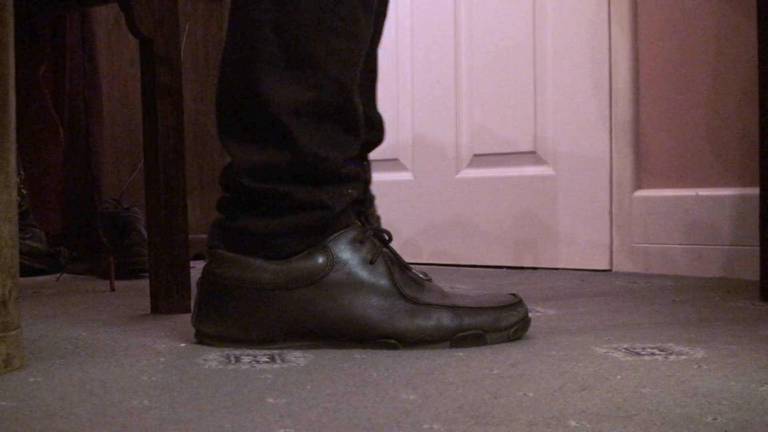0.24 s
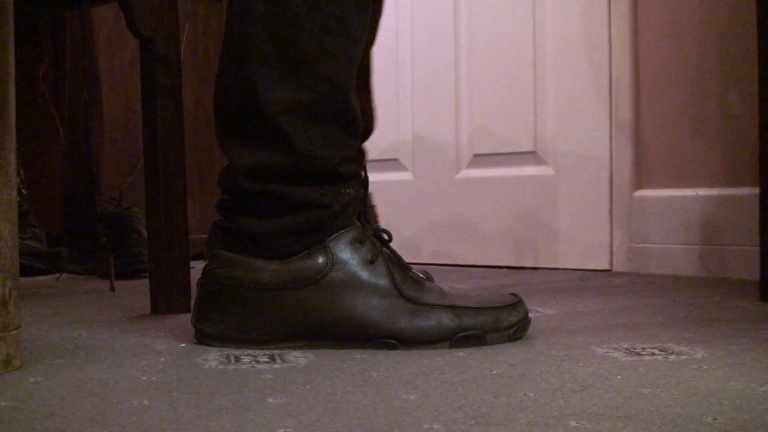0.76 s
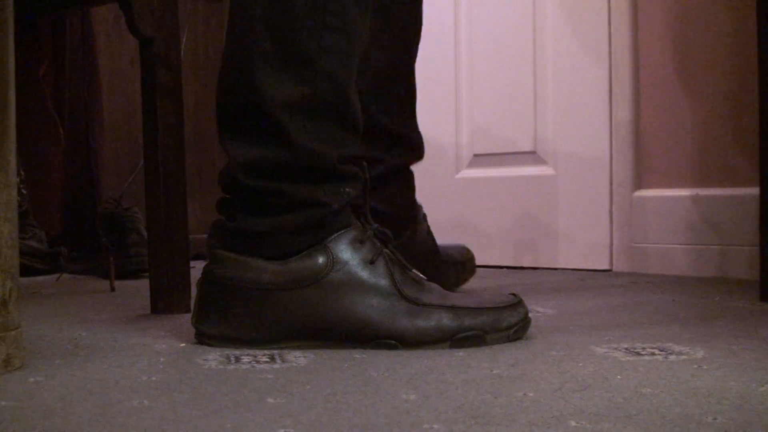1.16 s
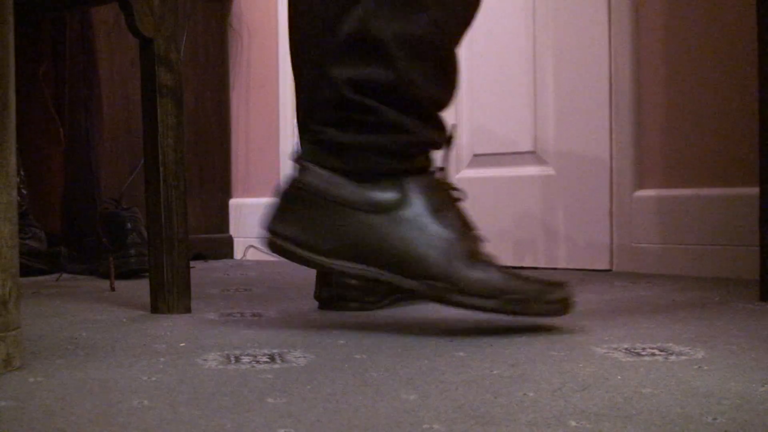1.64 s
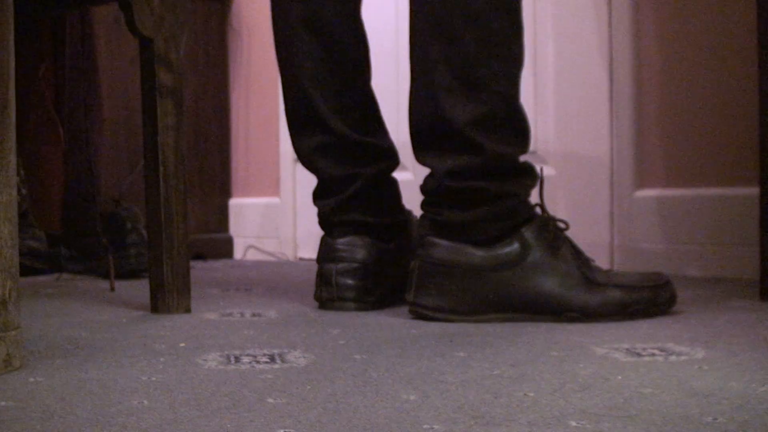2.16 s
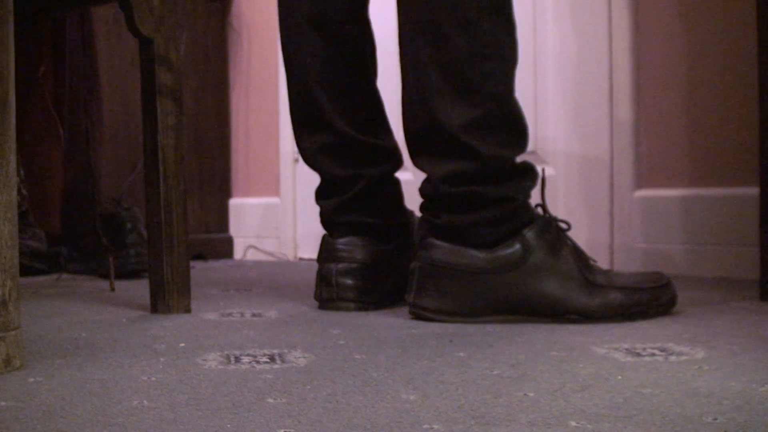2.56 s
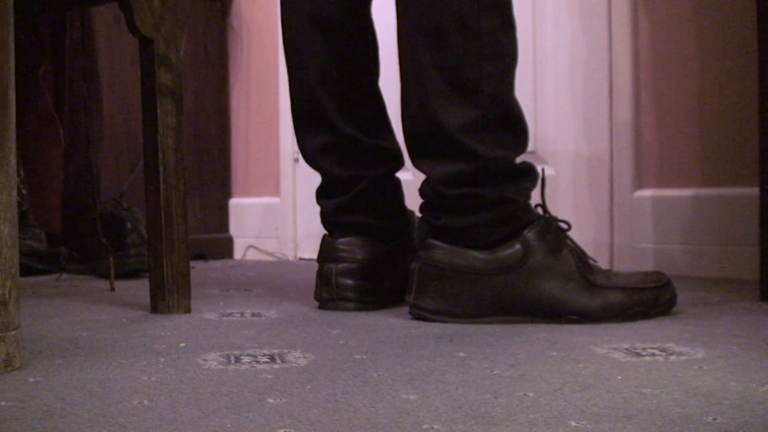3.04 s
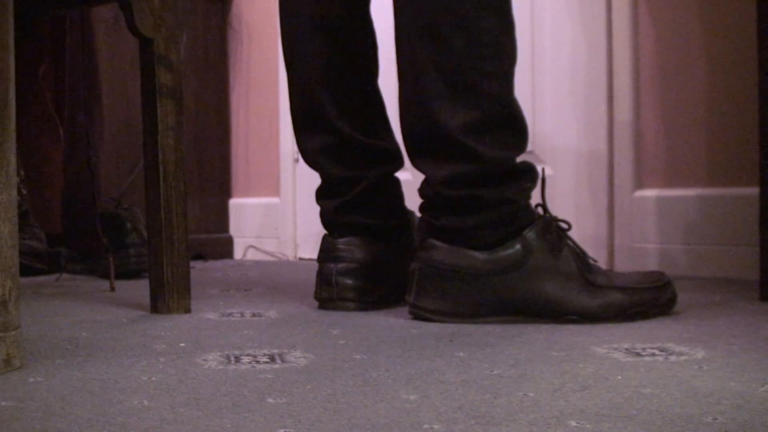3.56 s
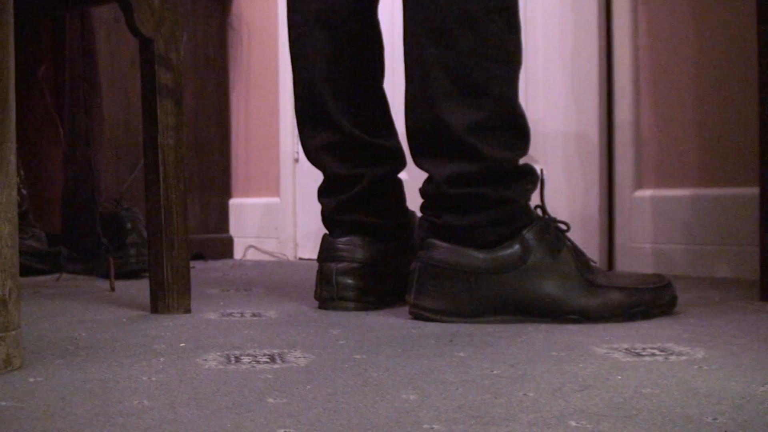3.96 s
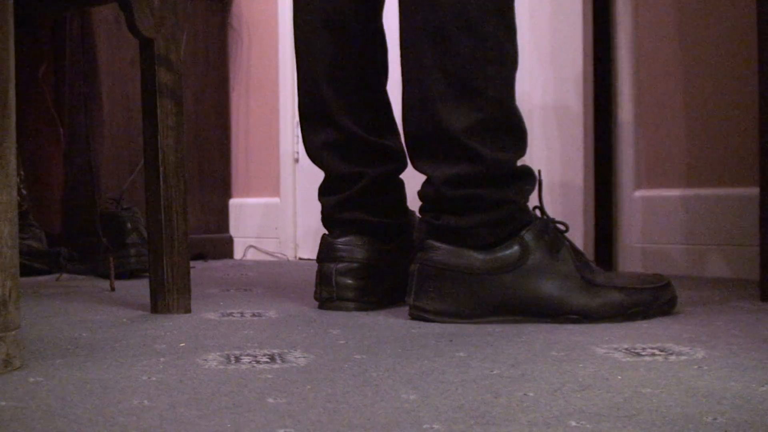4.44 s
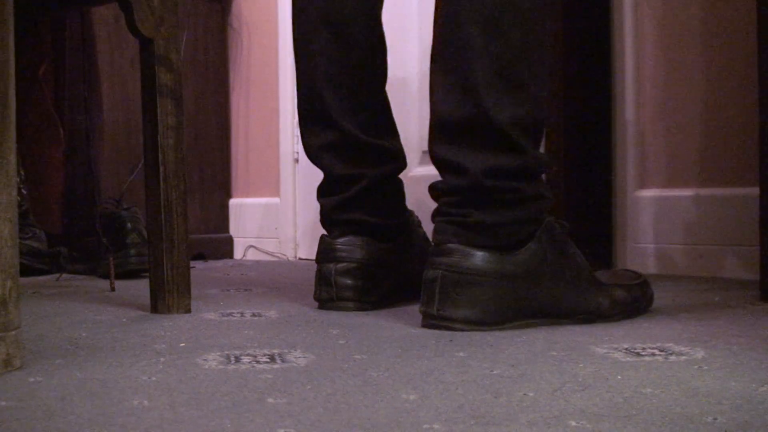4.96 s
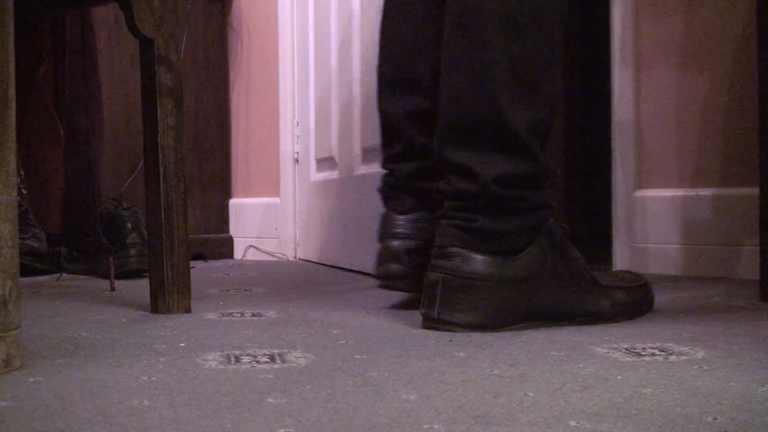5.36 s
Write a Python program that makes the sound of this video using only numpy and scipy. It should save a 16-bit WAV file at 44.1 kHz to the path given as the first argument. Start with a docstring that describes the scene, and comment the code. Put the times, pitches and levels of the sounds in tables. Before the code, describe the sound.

A faint steady hiss and hum fill a small carpeted room, heard from floor height. At about 0.2 seconds a leather shoe lands with a dull thud, followed by soft brushing shuffles and lighter steps around 1.4 and 1.9 seconds. From 2.2 seconds a door handle turns slowly, with quiet rubbing and scattered spring ticks. Around 3 seconds the bolt draws back in a quick cluster of small metal clicks and tiny squeaks. After a short pause, the wooden door drags against its frame from 3.8 seconds, ticking and squeaking briefly. At 4.1 seconds it judders free with a loud, hollow knock and metallic clack, and the latch snaps out sharply just after, at 4.2 seconds. This double hit is the loudest moment and dies away quickly. The feet then shift softly, with a step at 4.5 seconds, a scuff at 4.8 and another step at 5.2.

```python
"""Over steady hiss and faint hum, leather shoes step and shuffle on carpet in a small room:
heels thud on the boards beneath, soles slap and brush the pile. A door handle turns with
spring ticks, scraping and stick-slip squeaks, and the bolt clicks back. The panelled wooden
door drags on its frame and judders free with a loud knock; the latch snaps out.
The feet shift again. All is heard from floor height."""
import sys
import numpy as np
from scipy import signal
from scipy.fft import rfft, irfft
from scipy.io import wavfile

SR = 44100
rng = np.random.default_rng(int(sys.argv[2]) if len(sys.argv) > 2 else 0)


def file_out(sig):
    """Save sig as 16-bit WAV at sys.argv[1]."""
    # one column per channel
    cols = np.atleast_2d(sig).T
    # limit, then scale
    lim = np.clip(cols, -1, 1)
    pcm = np.round(lim * 32767).astype(np.int16)
    wavfile.write(sys.argv[1], SR, pcm)


N = 246519
ROOM_T60_S = 0.26

# Room tone and hiss. Each row: frequency in Hz, relative density in dB.
AIR_SPECTRUM = [(12, -30), (20, 0.5), (64, -2.5), (87, -6), (122, -2), (153, -13), (175, -5.5), (245, -6),
                (372, -9), (427, -11.5), (788, -11.5), (857, -16), (2030, -20.5), (2840, -20.5),
                (15500, -27)]
# Hum and thin electrical whine. Each row: frequency in Hz, RMS level in dB.
HUM_TONES = [(99, -69), (150.7, -67), (2099, -76.5), (2401, -82.5), (3300, -83), (4199, -88), (4802, -81.5),
             (5399, -82.5), (6756, -86)]
# Heel and toe landings. Each row: start in seconds, thud in dB, slap in dB, roll-down in seconds.
FOOTFALLS = [(.191, -32, -30, 0.029), (1.34, -53, -49, 0.00066), (1.476, -49.5, -46.5, 0.0017),
             (1.861, -45, -36, 0.0073), (1.905, -46, -51, 0.0028), (1.921, -60, -43.5, 0.0025),
             (4.535, -51.5, -57, .005), (5.225, -54, -46, 0.0017)]
# Boards under the carpet. Each row: frequency in Hz, gain in dB, T60 in seconds.
BOARD_MODES = [(63, -11, 0.21), (97.8, -4.5, 0.23), (150.7, -6.5, 0.077), (257, 0.5, 0.053),
               (322.6, 7, 0.039), (349, -7, 0.05)]
# Sole landing on the pile. Each row: frequency in Hz, relative level in dB.
SOLE_SPECTRUM = [(100, -43), (300, -0.5), (600, 7.5), (850, -1), (1200, -2.5), (2000, -9), (4000, -18),
                 (8000, -32), (15000, -46)]
# Brushing soles (dull) and trouser legs (bright). Each row: centre in seconds,
# half width in seconds, level in dB, tilt in dB per octave.
SCUFF_STROKES = [(0.411, 0.049, -54, .5), (0.639, 0.07, -64, 1), (0.937, .044, -59.5, 0.5),
                 (1.421, 0.094, -58.5, -1), (1.596, .04, -59, 3), (4.794, .03, -47.5, 1),
                 (4.851, .048, -55, 3.5), (5.227, 0.08, -63, 1)]
# Dry rubbing. Each row: frequency in Hz, relative level in dB.
RUB_SPECTRUM = [(80, 4.5), (200, 1.5), (400, 2), (750, 3), (1100, -4), (1800, -6), (3800, -12),
                (6000, -25.5), (15000, -46)]
# Handle rubbing, following hand pressure. Each row: time in seconds, level in dB.
TURN_ENVELOPE = [(2.15, -70), (2.24, -51.5), (2.36, -61.5), (2.55, -58), (2.8, -57.5), (2.95, -55),
                 (3.12, -59), (3.23, -61.5), (3.42, -78)]
# That rubbing, passed on by the door. Each row: frequency in Hz, relative level in dB.
RUMBLE_SPECTRUM = [(25, -4), (45, -10), (75, 0), (115, 5.5), (210, -1), (300, -14), (600, -6.5), (900, -16),
                   (1700, -21), (4000, -54)]
# Spring and spindle ticking under load. Each row: start in seconds, level in dB, ring in Hz.
SPRING_TICKS = [(2.180, -47, 4020), (2.3669, -50.5, 1190), (2.473, -42, 3660), (2.5657, -48, 3200),
                (2.637, -57, 1700), (2.716, -47.5, 3250), (2.873, -43.5, 3300), (2.9519, -46, 1890),
                (2.9816, -44.5, 4050), (3.76, -44, 1480), (3.8103, -42.5, 3600), (3.917, -48, 2910),
                (3.943, -49, 2740), (3.9748, -41.5, 2700), (4.032, -39.5, 3560), (4.079, -37.5, 2400),
                (4.228, -35.5, 2950), (4.8328, -48.5, 1510)]
# Bolt draws back, catches, tears past the strike plate, springs out. Each row: start in seconds,
# click in dB, tilt in dB per octave, ring in Hz, ring gain in dB, T60 in seconds, wood in dB.
BOLT_CLACKS = [(3.0132, -36, -1, 2940, -7, .03, -41.5), (3.0385, -35, -1, 4100, 7, 0.018, -42),
               (3.083, -41, -4, 6340, 14, .036, -50.5), (3.1204, -39, -2, 7230, 13.5, 0.036, -40),
               (3.8323, -36, -5.5, 5160, -2, 0.066, -46.5), (4.103, -24.5, -1, 2010, -4, 0.12, -45),
               (4.1125, -16.5, -5, 2400, -4, 0.011, -24), (4.1167, -19.5, 2.5, 6330, -6, 0.03, -25),
               (4.2329, -20.5, 5, 4100, -1, 0.0305, -20.5), (4.6958, -49, -1, 8400, 12, 0.041, -50.5)]
# Metal contact. Each row: frequency in Hz, relative level in dB.
METAL_SPECTRUM = [(200, -17), (600, -2), (1400, -4.5), (2300, 0.5), (4000, -2), (5500, -4.5), (7200, -7.5),
                  (8200, -9), (9200, -16.5), (12500, -24.5), (15500, -25.5)]
# Wood around the lock. Each row: frequency in Hz, relative level in dB.
WOOD_SPECTRUM = [(70, -6), (115, -21), (200, -12), (320, -20.5), (440, -6), (560, -3.5), (640, -10),
                 (780, 0.5), (900, 0.5), (1050, -8.5), (1500, -8.5), (3000, -36.5)]
# Lock case and handle plate. Each row: frequency in Hz, width in Hz, gain in dB.
LOCK_MODES = [(1480, 11.4, -11), (1773, 23, 5), (2930, 27, 1), (3275, 10, 2.5), (3990, 28, -0.5),
              (5220, 39, 2), (5950, 20, 2), (6566, 39, 6), (7400, 22, -7)]
# Stick-slip of dry metal and wood. Each row: start in seconds, length in seconds, pitch in Hz,
# pitch rise as a fraction, level in dB, third partial in relative dB.
SQUEAK_SLIPS = [(2.242, .055, 747, 0.13, -57.5, -24), (3.043, 0.015, 2256, 0.056, -36.5, -7),
                (3.058, .009, 2470, .02, -36.5, -15), (3.828, 0.0576, 778.4, -0.022, -38, -33),
                (3.901, 0.022, 443, 0.0036, -49, -25), (4.051, 0.016, 650, 0.052, -42, -17.5),
                (4.088, 0.0194, 3200, 0.054, -39.5, -23.5)]
# Blows to the door. Each row: start in seconds, level in dB, gain below 300 Hz in dB,
# sway level in dB, sway T60 in seconds.
DOOR_BLOWS = [(3.238, -67, -2, -41, 0.52), (4.1173, -15.5, -2, -37, .9), (4.234, -30, -20, -42, 0.81)]
# Door panels. Each row: frequency in Hz, gain in dB, T60 in seconds.
DOOR_MODES = [(104, -10.5, 0.24), (114.2, -9, 0.2), (199.8, -6.5, 0.23), (240.6, -2, 0.11),
              (434, -6.5, 0.137), (467.5, -11, 0.16), (556.7, 1, 0.124), (682, -0.5, 0.083),
              (725, 1.5, 0.11), (814, -16.5, 0.43), (853, -13, 0.19), (1025, -19, 0.072),
              (1196, -26.5, 0.19), (1458, -9, 0.071), (1549, -16, 0.24), (1843, -18, 0.197),
              (2400, -11, 0.086)]


def amp(db):
    """Decibels to gain."""
    return 10 ** (np.asarray(db) / 20)


def clock(length_s):
    """Sample times from zero."""
    return np.arange(int(length_s * SR)) / SR


def add(track, start_s, sound):
    """Mix a sound into a track."""
    i = max(int(start_s * SR), 0)
    track[i:i + len(sound)] += sound[:len(track) - i]


def fade(t, t60_s, rise_s):
    """Exponential rise and decay."""
    return (1 - np.exp(-t / rise_s)) * np.exp(-np.log(1000) * t / t60_s)


def held(start_s, end_s, edge_s):
    """Trapezoid envelope."""
    t = np.arange(N) / SR
    return np.clip(np.minimum(t - start_s, end_s - t) / edge_s, 0, 1)


def wander(count, rate_hz):
    """Smooth random curve, spread near 1."""
    knots = np.arange(count) * rate_hz / SR
    return np.interp(knots, np.arange(count), rng.standard_normal(count))


def colour(x, spectrum, tilt_db_oct=0, size=4096):
    """Causal filter through tilted (Hz, dB) points; white noise keeps its power."""
    hz, db = np.transpose(spectrum)
    knots = np.log2(hz)
    octave = np.log2(np.maximum(np.fft.rfftfreq(size, 1 / SR), 10))
    gain = amp(np.interp(octave, knots, db) + tilt_db_oct * np.clip(octave, knots[0], knots[-1]))
    cepstrum = irfft(np.log(gain / np.sqrt(np.mean(gain ** 2))))
    cepstrum[1:size // 2] *= 2  # fold to minimum phase
    cepstrum[size // 2 + 1:] = 0
    return signal.fftconvolve(x, irfft(np.exp(rfft(cepstrum))))[:len(x)]


def lowpass(x, hz):
    """First-order treble roll-off."""
    return signal.sosfilt(signal.butter(1, hz, fs=SR, output="sos"), x)


def resonate(x, hz, width_hz):
    """One resonance, gain 1 at its centre."""
    return signal.lfilter(*signal.iirpeak(hz, hz / width_hz, fs=SR), x)


def burst(t60_s, rise_s, wet_db, echo_db=-7, echo_s=0.006):
    """Dense modes struck at once, with a near-wall echo and a duller room tail."""
    t = clock(0.5)
    near, far = rng.standard_normal((2, len(t)))
    direct = fade(t, t60_s, rise_s)
    echo = amp(echo_db) * fade(np.maximum(t - echo_s, 0), t60_s, rise_s)
    tail = amp(wet_db) * np.sqrt(t60_s / ROOM_T60_S) * fade(t, ROOM_T60_S, rise_s=0.0048)
    return near * np.hypot(direct, echo) + lowpass(far, hz=9500) * tail


def grains(count, grain_db):
    """Dense friction: tiny slips of very uneven size."""
    slips = rng.standard_normal(count) * amp(grain_db * rng.exponential(size=count).clip(0, 5))
    return slips / slips.std()


def room(x, wet_db):
    """Add the short, soft tail of a carpeted room."""
    t = clock(0.5)
    tail = lowpass(rng.standard_normal(len(t)) * fade(t, ROOM_T60_S, rise_s=0.0052), hz=7000)
    return x + amp(wet_db) * signal.fftconvolve(x, tail / np.linalg.norm(tail))[:N]


def background(air_db=-57):
    """Low room rumble, even hiss and steady electrical tones."""
    t = np.arange(N) / SR
    hum = sum(amp(db) * np.sin(2 * np.pi * (hz * t + rng.random())) for hz, db in HUM_TONES)
    return amp(air_db) * colour(rng.standard_normal(N), AIR_SPECTRUM) + np.sqrt(2) * hum


def footfalls():
    """The heel thuds on the boards; the sole rolls down, softened by carpet."""
    out, t = np.zeros(N), clock(0.4)
    thud = sum(amp(db) * np.sin(2 * np.pi * hz * t) * fade(t, t60_s, rise_s=0.0044)
               for hz, db, t60_s in BOARD_MODES)
    for start_s, thud_db, slap_db, roll_s in FOOTFALLS:
        slap = burst(t60_s=0.036 + 4.4 * roll_s, rise_s=roll_s, wet_db=-9.5)
        slap = colour(slap, SOLE_SPECTRUM, tilt_db_oct=2 - 49.5 * roll_s)  # slower is duller
        add(out, start_s, amp(thud_db) * thud + amp(slap_db) * slap[:len(t)])
    return out


def scuffs(patchy_db=2):
    """Fibres catch and let go as a foot or leg moves."""
    out = np.zeros(N)
    for centre_s, half_s, db, tilt_db_oct in SCUFF_STROKES:
        t = clock(4 * half_s)
        pressure = np.exp(-(t / half_s - 2) ** 2) * amp(patchy_db * wander(len(t), rate_hz=61.4))
        rub = colour(grains(len(t), grain_db=2.5) * pressure, RUB_SPECTRUM, tilt_db_oct)
        add(out, centre_s - 2 * half_s, amp(db) * rub)
    return out


def handle(patchy_db=2, scrape_db=2.5, wind_up_db_per_s=9.5, stop_s=3.17, ring_db=0.5):
    """Uneven rubbing rumbles the hollow door; the spring scrapes louder as it winds to the stop."""
    t = np.arange(N) / SR
    turn_db = np.interp(t, *np.transpose(TURN_ENVELOPE), left=-np.inf, right=-np.inf)
    rub = grains(N, grain_db=2) * amp(turn_db + patchy_db * wander(N, rate_hz=27))
    rumble = colour(rub, RUMBLE_SPECTRUM)
    winding = held(TURN_ENVELOPE[0][0], stop_s, edge_s=0.04)
    tension = amp(turn_db + scrape_db + wind_up_db_per_s * (t - stop_s)) * winding
    scrape = colour(grains(N, grain_db=5.5) * tension, RUB_SPECTRUM, tilt_db_oct=-1)
    return rumble + scrape + amp(ring_db) * resonate(scrape, hz=1430, width_hz=750)


def latch():
    """Each metal contact cracks, rings its part and the lock case, and excites the nearby wood."""
    metal, wood = np.zeros(N), np.zeros(N)

    def contact(start_s, db, tilt_db_oct, ring_hz, ring_db, t60_s, wood_db, ring_q):
        crack = amp(db) * colour(burst(t60_s, rise_s=0.00019, wet_db=-0.5), METAL_SPECTRUM, tilt_db_oct)
        add(metal, start_s, crack + amp(ring_db) * resonate(crack, ring_hz, ring_hz / ring_q))
        knock = colour(burst(t60_s=0.063, rise_s=0.0013, wet_db=0.5), WOOD_SPECTRUM)
        add(wood, start_s, amp(wood_db) * knock)

    for clack in BOLT_CLACKS:
        contact(*clack, ring_q=9.9)
    for start_s, db, hz in SPRING_TICKS:
        contact(start_s, db, tilt_db_oct=-4.5, ring_hz=hz, ring_db=7,
                t60_s=0.024, wood_db=db - 5, ring_q=11)
    case = sum(amp(db) * resonate(metal, hz, width_hz) for hz, width_hz, db in LOCK_MODES)
    return metal + case + wood


def squeaks(flutter_db=2, sag_db=4):
    """Stick-slip tones of spindle, bolt and door edge; each weakens as the grip eases."""
    out = np.zeros(N)
    for start_s, length_s, pitch_hz, rise, db, third_db in SQUEAK_SLIPS:
        count = int(length_s * SR)
        along = np.linspace(-0.5, 0.5, count)
        waver = 0.12 * (1013 / pitch_hz) ** 0.43  # lower is rougher
        hz = pitch_hz * (1 + rise * along) * (1 + waver * wander(count, rate_hz=1800))
        phase = 2 * np.pi * np.cumsum(hz) / SR
        partials_db = (0, third_db - 8, third_db)  # stick-slip favours odd partials
        tone = sum(amp(part_db) * np.sin(k * phase) for k, part_db in enumerate(partials_db, 1))
        grip = amp(db - sag_db * along + flutter_db * wander(count, rate_hz=250))
        add(out, start_s, np.sqrt(2) * tone * grip * signal.windows.tukey(count, 0.3))
    return out


def door_knocks(chatter_rad=0.52, sway_hz=43.3):
    """A blow rings the loose panels and sways the whole leaf on its hinges."""
    panels, sway, t = np.zeros(N), np.zeros(N), clock(1)
    for start_s, db, bass_db, sway_db, sway_t60_s in DOOR_BLOWS:
        for hz, mode_db, t60_s in DOOR_MODES:
            # chatter against the frame smears each mode into a narrow band
            phase = 2 * np.pi * (hz * t + rng.random()) + chatter_rad * wander(len(t), rate_hz=136)
            ring = np.sin(phase) * fade(t, t60_s, rise_s=0.0042)
            add(panels, start_s, amp(db + mode_db + bass_db * (hz < 300)) * ring)
        leaf = np.sin(2 * np.pi * sway_hz * t) * fade(t, sway_t60_s, rise_s=0.0034)
        add(sway, start_s, amp(sway_db) * leaf)
    return panels, sway


def door_drag(level_db=-54, patchy_db=3):
    """The pulled door's edge rubs the frame in fits until it comes free."""
    pull = held(start_s=3.78, end_s=4.11, edge_s=0.0054)
    pressure = pull * amp(level_db + patchy_db * wander(N, rate_hz=60))
    return colour(grains(N, grain_db=2) * pressure, RUB_SPECTRUM, tilt_db_oct=0.5)


def scene():
    """Feet, lock and door in one small room; mono."""
    panels, sway = door_knocks()
    feet = footfalls() + room(scuffs(), wet_db=-9)
    lock = latch() + room(squeaks(), wet_db=-9)
    door = room(panels + handle() + door_drag(), wet_db=-14) + sway
    return (feet + lock + door + background())[None]


def record(dry):
    """Steep low-pass at 15.8 kHz."""
    return signal.sosfilt(signal.ellip(10, 0.1, 70, 15800, fs=SR, output="sos"), dry)


dry = scene()
out = record(dry)
file_out(out)
```